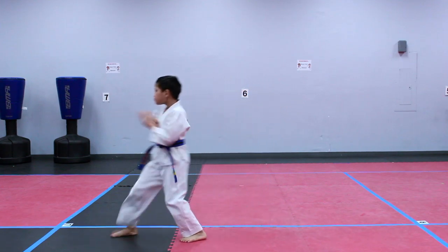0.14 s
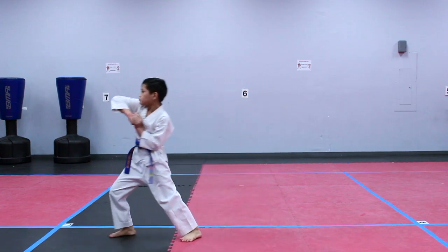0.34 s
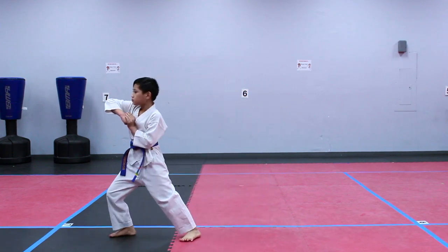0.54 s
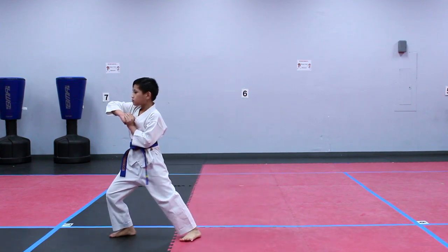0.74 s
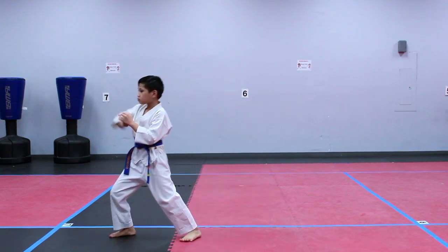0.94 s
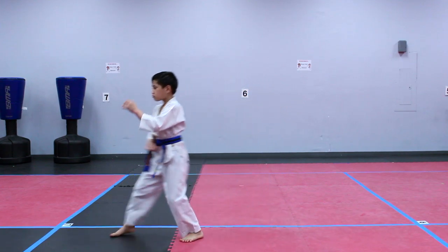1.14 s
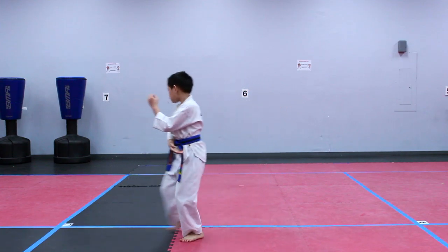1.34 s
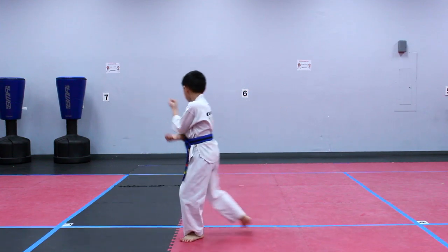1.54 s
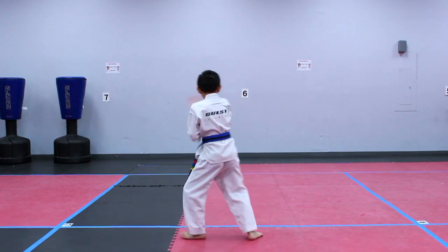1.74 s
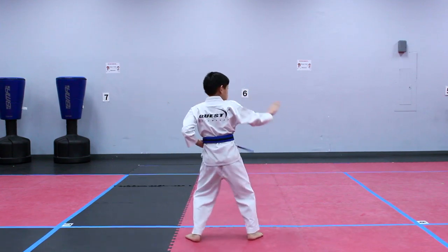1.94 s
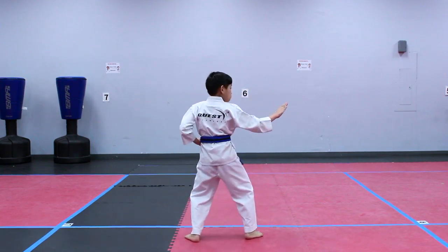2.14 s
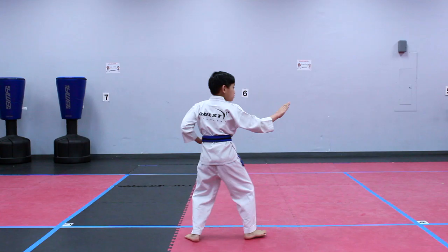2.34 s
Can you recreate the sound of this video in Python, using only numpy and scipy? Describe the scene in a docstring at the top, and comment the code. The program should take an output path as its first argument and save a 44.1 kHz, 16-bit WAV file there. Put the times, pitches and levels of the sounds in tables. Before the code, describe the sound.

A stiff cotton sleeve snaps sharply as a bare foot stamps on a foam mat, booming briefly in a quiet hall. Soft steps and cloth swishes follow as a child turns, heard through a microphone near the mat.

```python
"""Stiff cotton sleeves crack taut in a block as a bare front foot lands on a foam mat. A child is practising a
form in a quiet hall, heard through one microphone near the mat. Soft steps and a turn follow: soles thud softly
on the mat, cloth swishes, small folds tick. Farther off, the hall answers cloth and feet over faint ventilation
noise."""
import sys
import numpy as np
from scipy import signal
from scipy.fft import rfft, irfft
from scipy.io import wavfile
from scipy.ndimage import uniform_filter1d

SR = 44100
rng = np.random.default_rng(int(sys.argv[2]) if len(sys.argv) > 2 else 0)


def log_audio(samples):
    """Write samples as a 16-bit WAV file to the path given in sys.argv[1]."""
    # one column per channel
    frames = np.atleast_2d(samples).T
    # limit to full scale, then quantise
    limited = np.clip(frames, -1, 1)
    pcm = np.round(limited * 32767).astype(np.int16)
    wavfile.write(sys.argv[1], SR, pcm)


N = 105840  # 2.4 s


# cloth pulled taut, close to the microphone: start_s, level_db, decay_s, tilt_db_per_octave
SLEEVE_CRACKS = [(0.2056, -15.5, .0012, 0.5), (0.2115, -10.5, 0.0017, -1), (0.2164, 6, 0.00067, 0),
                 (0.2193, -1, 0.00084, -2.5), (0.2222, 4.5, 0.00092, 1.5), (0.2233, 6, 0.00056, 0),
                 (.2250, 2.5, 0.0015, -0.5), (0.2292, -2.5, .0004, 2.5), (0.2334, -6, 0.0034, 1.5)]
# spectrum of a crack before its tilt: frequency_hz, level_db
SLEEVE_SPECTRUM = [(30, -42), (100, -10.5), (300, -0.5), (650, -5), (1000, -0.5), (1200, 1.5), (1450, -2.5),
                   (1900, -4.5), (3000, -3.5), (4100, -3.5), (4900, 1.5), (6800, 1), (8500, -6),
                   (10500, -16.5), (12000, -30), (15500, -58)]

def sleeve_snap():
    """Sleeves and jacket crack taut in a quick volley, some cracks brighter than others."""
    out = np.zeros(N)
    for start_s, level_db, decay_s, tilt in SLEEVE_CRACKS:
        spectrum = [(hz, db + tilt * np.log2(hz)) for hz, db in SLEEVE_SPECTRUM]
        add(out, start_s, amp(level_db) * coloured(fibre_crack(decay_s), spectrum))
    return out


def fibre_crack(decay_s, rise_s=0.00017, size=512):
    """A tiny burst of slipping fibres with an even spectrum and energy 1."""
    t = np.arange(size) / SR
    envelope = (1 - np.exp(-(t / rise_s) ** 2)) * np.exp(-t / decay_s)
    burst = rng.standard_normal(size) * envelope
    for _ in range(3):
        spectrum = rfft(burst)
        flat = irfft(spectrum / (abs(spectrum) + 1e-12))
        # press the flattened burst back under its envelope
        burst = np.tanh(flat / (envelope + 1e-9) * np.linalg.norm(envelope)) * envelope
    return unit_energy(burst)


# bare feet landing on the mat, and the thumps that follow: peak_s, level_db, pitch_hz, half_length_cycles
FOOTFALLS = [(0.2124, -8, 290, 0.26), (0.2202, 7, 367, 0.51), (.705, -31, 520, 0.61),
             (1.3743, -16.5, 477, 0.41), (1.6939, -14, 333, 0.27), (1.701, -19.5, 172, 0.3),
             (1.7054, -19, 466, 0.3), (1.7192, -19, 434, .35), (1.737, -20, 340, 0.49)]

def footsteps(phase_rad=0.27):
    """Bare feet land on the foam with short, low thuds, some followed by further thumps."""
    t, out = np.arange(N) / SR, np.zeros(N)
    for peak_s, level_db, pitch_hz, half_length in FOOTFALLS:
        cycles = (t - peak_s) * pitch_hz
        envelope = np.exp(-(cycles / half_length) ** 2 / 2)
        thud = envelope * np.cos(2 * np.pi * cycles + phase_rad)
        out += amp(level_db) * unit_energy(thud)
    return out


# mat and floor under the stamp: frequency_hz, level_db
FLOOR_SPECTRUM = [(25, -56), (55, -8), (105, -2.5), (170, -1), (260, -6.5), (360, -5), (470, -15),
                  (700, -29), (1500, -48)]

def floor_boom(start_s=0.214, level_db=-4, rise_s=0.0078, t60_s=0.96):
    """Mat and floor boom under the stamping foot, and the low rumble hangs on."""
    age_s = np.maximum(np.arange(N) / SR - start_s, 0)
    envelope = (1 - np.exp(-age_s / rise_s)) * amp(-60 * age_s / t60_s)
    rumble = coloured(rng.standard_normal(N), FLOOR_SPECTRUM)
    return amp(level_db) * unit_energy(rumble * envelope)


# loose cloth flapping just after the block: peak_s, level_db, rise_s, fall_s
FLAP_STROKES = [(.231, -23.5, 0.0042, 0.0094), (.249, -27, 0.0076, 0.016)]
# the low rush of a flap: frequency_hz, level_db
FLAP_SPECTRUM = [(60, -24), (150, -12.5), (250, -2), (380, 3.5), (480, -5), (600, -10), (780, -8.5),
                 (1000, -13), (1250, -9.5), (2000, -34), (5000, -55)]

def jacket_flaps():
    """The flapping jacket and trousers shove air aside."""
    return grainy_strokes(FLAP_STROKES, FLAP_SPECTRUM)


# small folds in the uniform, heard close: start_s, level_db, centre_hz
FOLD_FLICKS = [(.2798, -10.5, 6800), (.3300, -19, 5040), (1.1903, -14.5, 5940), (1.198, -25, 5400),
               (1.2437, -14.5, 6700), (1.2447, -20, 5100), (1.2528, -17.5, 5700), (1.258, -22, 5250),
               (1.2693, -23, 6600), (1.2864, -24, 6100), (1.288, -23.5, 5870), (1.6983, -20.5, 4730),
               (1.704, -25, 4730), (1.7573, -21, 6700), (2.1079, -26, 5800), (2.1158, -25, 6200)]
# spectrum of one tick: multiple_of_centre, level_db
FOLD_SPECTRUM = [(.02, -21), (.1, 3), (.22, -6), (.4, -19), (.58, -0.5), (.72, -8), (0.899, 4), (1.25, 1.5),
                 (1.551, -15), (2.1, -24), (2.9, -45)]

def fold_ticks(decay_s=0.00027):
    """Single folds flick over, each with its own pitch."""
    out = np.zeros(N)
    for start_s, level_db, centre_hz in FOLD_FLICKS:
        spectrum = [(multiple * centre_hz, db) for multiple, db in FOLD_SPECTRUM]
        add(out, start_s, amp(level_db) * coloured(fibre_crack(decay_s), spectrum))
    return out


# arms and legs moving near the microphone: peak_s, level_db, rise_s, fall_s
SWISH_STROKES = [(.04, -70, .08, .1), (.19, -55, 0.022, 0.015), (.224, -21.5, 0.0056, 0.0093),
                 (1.04, -60, 0.038, 0.078), (1.185, -52, 0.017, .015), (1.243, -41, 0.015, 0.0085),
                 (1.285, -44, 0.012, 0.0086), (1.65, -61.5, 0.11, .04), (1.765, -49, 0.01, 0.035),
                 (1.842, -37.5, 0.045, 0.034), (2.15, -53, .04, 0.056), (2.35, -52.5, 0.037, 0.018)]
# cotton on cotton: frequency_hz, level_db
SWISH_SPECTRUM = [(100, -32), (500, 1.5), (1500, -8.5), (3500, -6.5), (5000, -3), (7200, 1.5), (9000, -9),
                  (12000, -25.5), (15500, -49)]

def cloth_swishes():
    """Sleeves and trousers brush, loudest where the move is fastest."""
    return grainy_strokes(SWISH_STROKES, SWISH_SPECTRUM)


# long slides down on the mat: peak_s, level_db, rise_s, fall_s
SLIDE_STROKES = [(.04, -53.5, 0.1, 0.11), (1.83, -45.5, 0.11, 0.04)]
# skin sliding on foam: frequency_hz, level_db
SLIDE_SPECTRUM = [(100, 2), (400, 2), (900, -1), (1700, 4.5), (3000, -4), (4500, 0), (7500, -7),
                  (10000, -12), (15500, -33)]

def sole_slides():
    """The sole rubs over the mat as the child turns."""
    return grainy_strokes(SLIDE_STROKES, SLIDE_SPECTRUM)


# short scuffs down on the mat: peak_s, level_db, rise_s, fall_s
SCUFF_STROKES = [(1.246, -41.5, 0.0083, 0.0086), (1.279, -46.5, 0.012, 0.019), (1.39, -49, .008, 0.03)]
# the dull rub of a scuff: frequency_hz, level_db
SCUFF_SPECTRUM = [(60, -17), (130, -6), (300, -5), (430, -6), (540, 6.5), (620, -1), (740, -22),
                  (1500, -39), (4000, -49)]

def sole_scuffs():
    """The sole scuffs the foam as it pushes off."""
    return grainy_strokes(SCUFF_STROKES, SCUFF_SPECTRUM)


# first reflections to reach the microphone from floor and walls: delay_s, gain
HALL_REFLECTIONS = [(.0082, 0.2), (0.0155, 0.11), (0.0268, .17), (0.0381, .12)]
# reverberation time of the hall: frequency_hz, t60_s
HALL_DECAY = [(100, 1), (250, 1), (500, 0.43), (1200, 0.72), (3500, 0.66), (7000, 0.65), (11000, 0.48),
              (15000, 0.4)]
# spectrum of the distant tail: frequency_hz, level_db
HALL_SPECTRUM = [(30, -29), (70, -8.5), (150, 1.5), (350, -4.5), (650, 1), (1200, -0.5), (3000, 1),
                 (5000, -3.5), (7000, -2), (13000, -0.5)]

def hall(sound, cycle_s, paths=4, build_s=0.005, density=0.15):
    """Early reflections, then dense tails that take turns as a moving source finds other paths."""
    t, out = np.arange(SR) / SR, np.zeros(N)
    build_up = 1 - np.exp(-(t / build_s) ** 2)
    cycles = np.arange(N) / SR / cycle_s
    for path in range(paths):
        echoes = rng.standard_normal(SR) * (rng.random(SR) < density) * build_up
        hz, age_s, bands = signal.stft(echoes, SR, nperseg=256)
        decay = amp(-60 * age_s / curve_at(HALL_DECAY, hz)[:, None])
        tail = signal.istft(bands * decay, SR)[1][:SR]
        tail = unit_energy(coloured(tail, HALL_SPECTRUM))
        turn = (cycles * paths - path) % paths
        share = np.sin(np.pi / 2 * np.minimum(turn, 2))  # equal-power crossfade between tails
        out += signal.fftconvolve(sound * share, tail)[:N]
    for delay_s, gain in HALL_REFLECTIONS:
        add(out, delay_s, gain * sound)
    return out


# room tone all round the microphone: frequency_hz, level_db
VENTILATION_SPECTRUM = [(15, -5), (40, -1), (80, 0), (180, -1.5), (350, -5.5), (700, -7.5), (1400, -9.5),
                        (2200, -13), (2700, -11.5), (3500, -14.5), (5000, -17), (7200, -18.5), (10000, -29),
                        (13000, -33.5), (15500, -42)]

def ventilation(level_db=-52.5):
    """The ventilation fills the hall with faint, steady, mostly low noise."""
    gain = amp(curve_at(VENTILATION_SPECTRUM, np.fft.rfftfreq(N, 1 / SR)))
    noise = irfft(rfft(rng.standard_normal(N)) * gain, N)
    return amp(level_db) * unit_rms(noise)


def grainy_strokes(strokes, spectrum, grain_db=1, grain_s=0.0014):
    """Grainy noise that swells and fades with the speed of each move."""
    t, power = np.arange(N) / SR, np.zeros(N)
    for peak_s, level_db, rise_s, fall_s in strokes:
        swell = np.exp(-np.maximum((peak_s - t) / rise_s, (t - peak_s) / fall_s))
        power += (amp(level_db) * swell) ** 2
    grain = unit_rms(uniform_filter1d(rng.standard_normal(N), int(grain_s * SR)))
    noise = unit_rms(rng.standard_normal(N) * amp(grain_db * grain))
    return coloured(noise * np.sqrt(power), spectrum)


def coloured(sound, spectrum, size=4096):
    """Applies a minimum-phase filter of energy 1 with the given spectrum."""
    hz = abs(np.fft.fftfreq(size, 1 / SR))
    log_gain = np.log(amp(curve_at(spectrum, hz)))
    response = np.exp(np.conj(signal.hilbert(log_gain)))
    taps = np.fft.ifft(response).real[:size // 2]
    return signal.fftconvolve(sound, unit_energy(taps))[:len(sound)]


def curve_at(points, hz):
    """Reads a table on a log-frequency axis."""
    points_hz, values = np.transpose(points)
    return np.interp(np.log(hz + 1), np.log(points_hz + 1), values)


def add(mix, start_s, sound):
    part = mix[round(start_s * SR):][:len(sound)]
    part += sound[:len(part)]


def amp(db):
    return 10 ** (np.asarray(db) / 20)


def unit_rms(x):
    return x / np.sqrt(np.mean(x ** 2) + 1e-20)


def unit_energy(x):
    return x / np.linalg.norm(x)


def scene():
    """One microphone by the mat: cloth and feet up close, hall and ventilation behind."""
    snap = sleeve_snap()
    feet = footsteps() + sole_scuffs()
    rustle = fold_ticks() + cloth_swishes() + sole_slides() + jacket_flaps()
    reverb = hall(amp(-3.5) * snap + amp(-6) * rustle, cycle_s=0.016)
    reverb += hall(amp(-3.5) * feet, cycle_s=0.09)
    return (snap + feet + rustle + reverb + floor_boom() + ventilation())[None]


def record(dry):
    """The recorder cuts off the treble at its band limit."""
    cutoff_hz = 15750
    lowpass = signal.firwin(511, cutoff_hz, window=("kaiser", 9), fs=SR)
    return signal.oaconvolve(dry, lowpass[None], "same")


dry = scene()
out = record(dry)
log_audio(out)
```